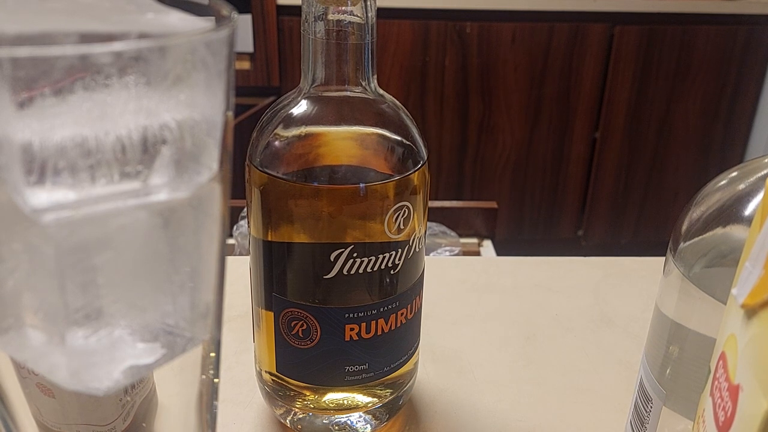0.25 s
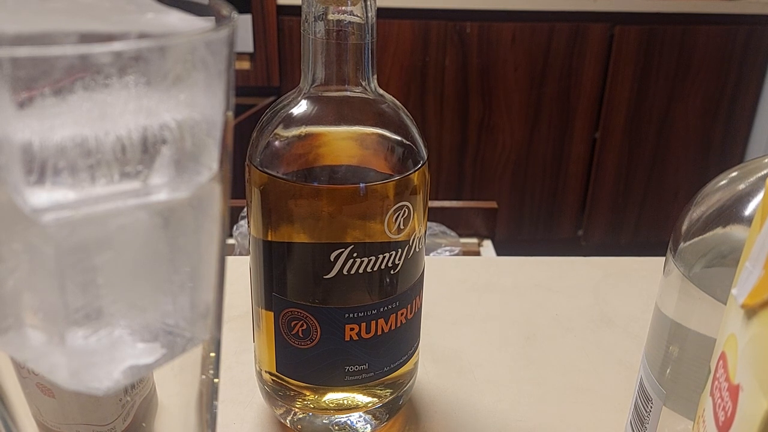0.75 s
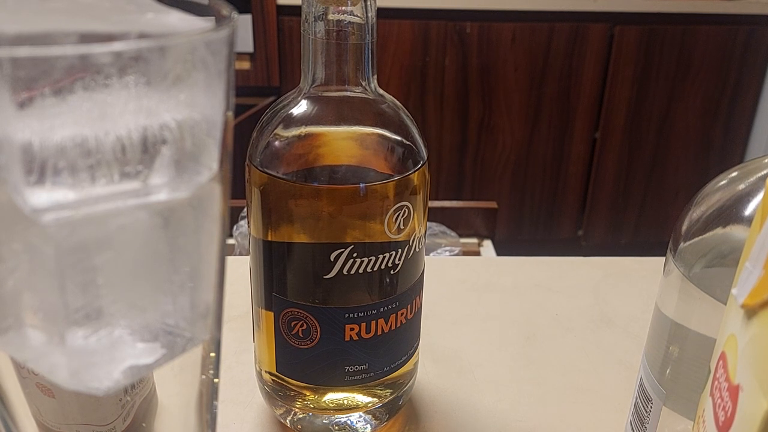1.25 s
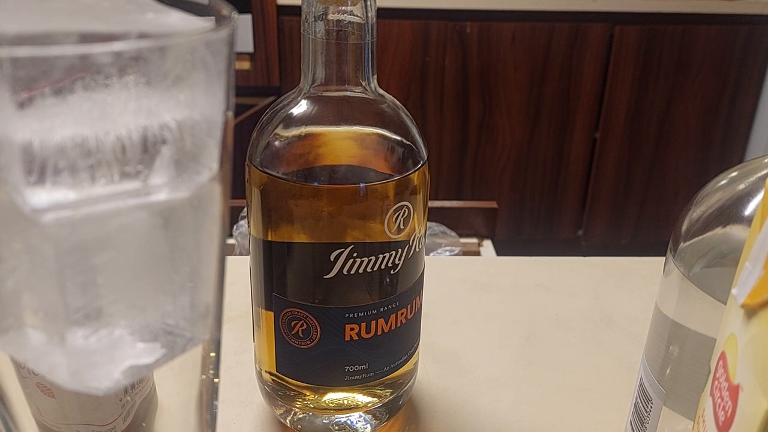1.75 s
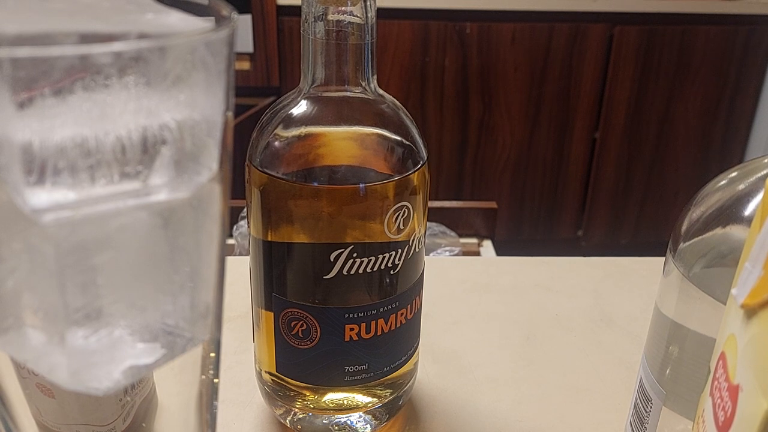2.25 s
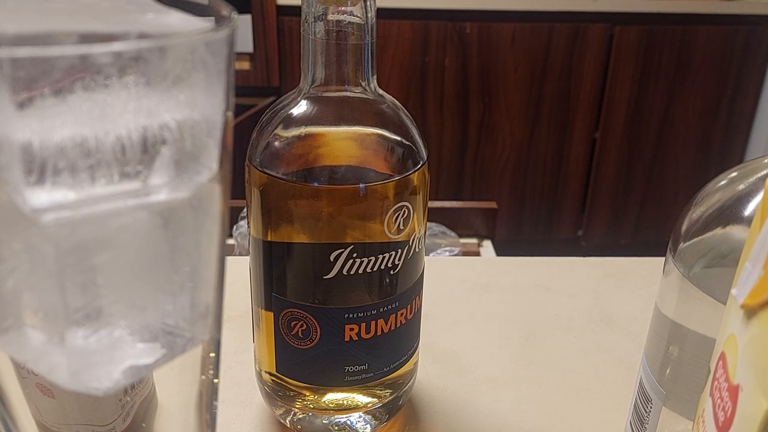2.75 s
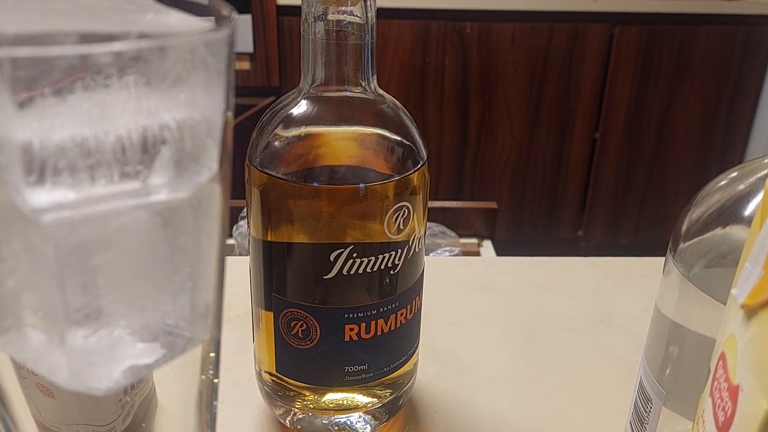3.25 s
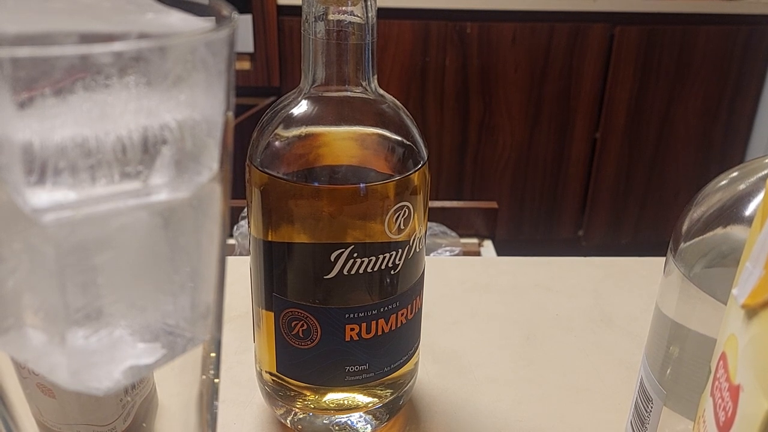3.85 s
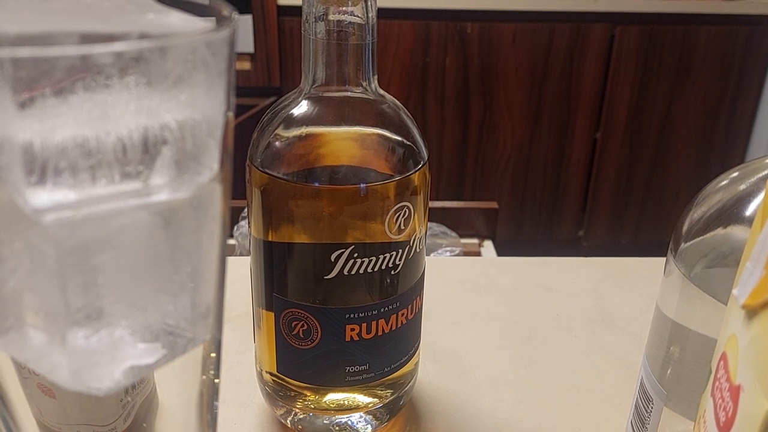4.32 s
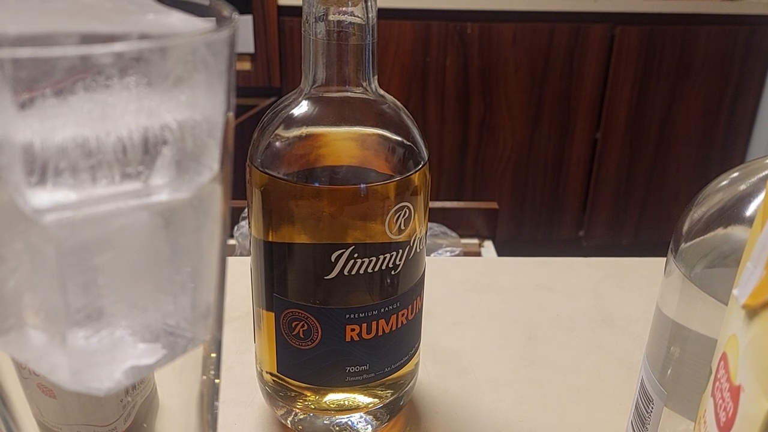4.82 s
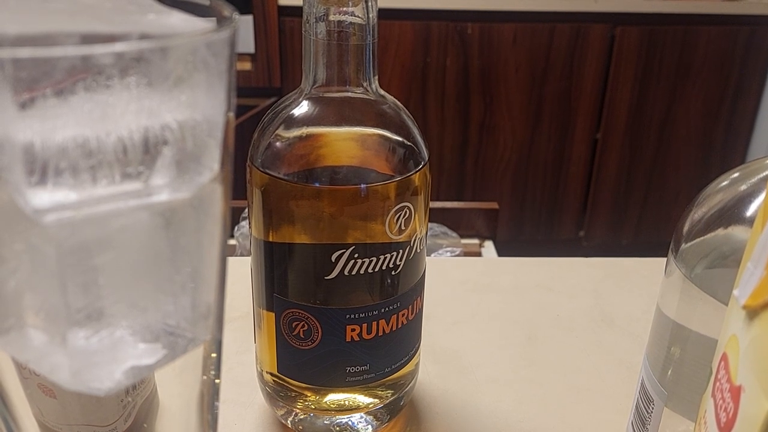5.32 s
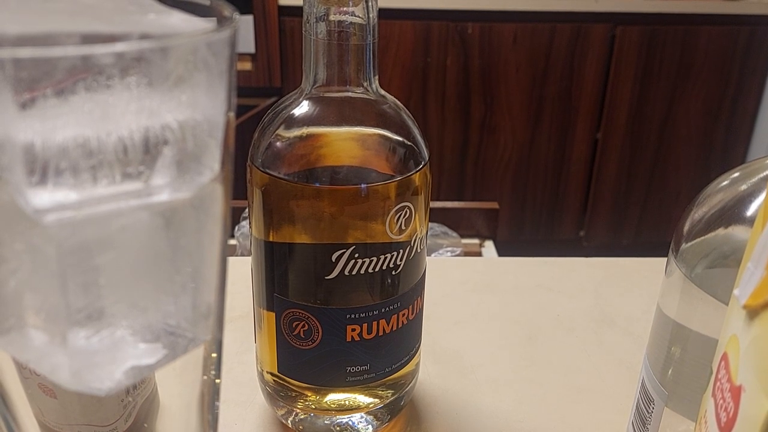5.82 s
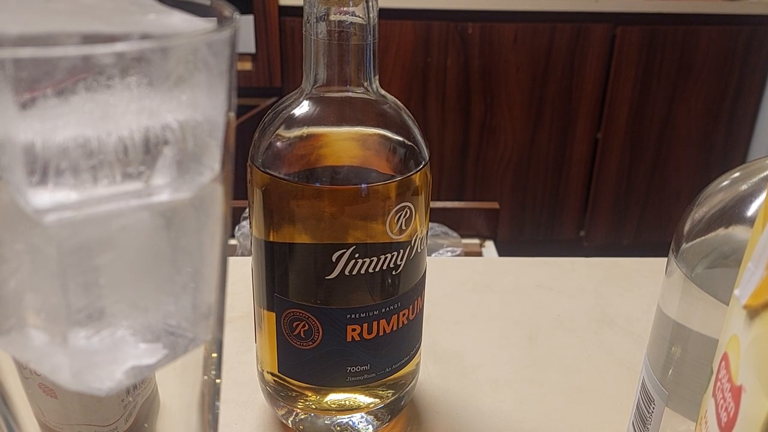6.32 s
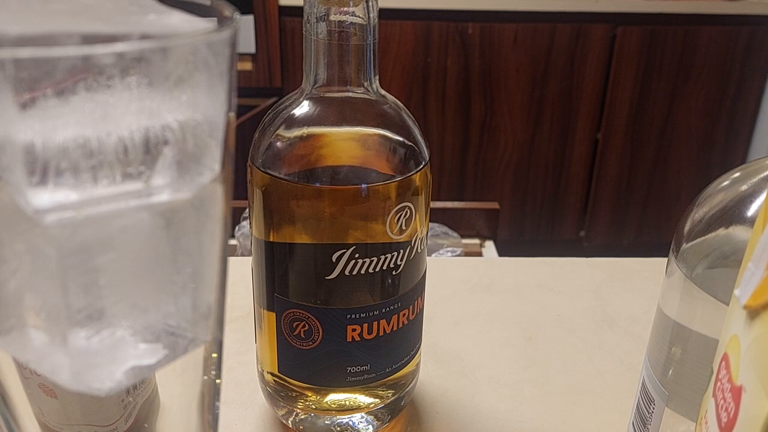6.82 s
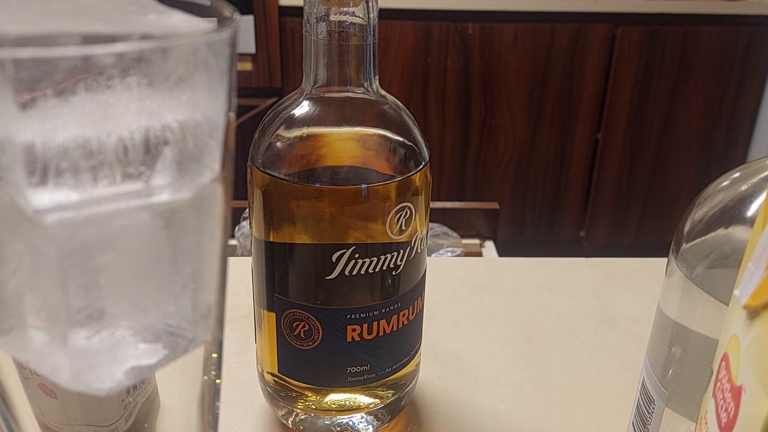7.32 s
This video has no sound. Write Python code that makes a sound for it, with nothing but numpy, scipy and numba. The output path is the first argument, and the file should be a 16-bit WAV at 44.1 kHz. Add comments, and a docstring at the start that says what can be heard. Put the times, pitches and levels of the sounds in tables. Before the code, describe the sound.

Ice cubes are thrown back and forth in a steel cocktail shaker, close to the microphone and a little to the right. Each quick stroke lands as a dense clatter with sharp knocks, a brief metallic ring and the crackle of chipping ice. Liquid gulps and hisses inside. The shaking goes on without a break, in a kitchen with a short echo and faint low room noise.

```python
"""In a kitchen, ice cubes are thrown to and fro in a steel cocktail shaker, close to the right of a phone.
Each throw piles the cubes against one end: a dense clatter and single hard knocks excite the normal
modes of the hand-damped shell and chip the ice. Air pockets in the liquid gulp, and spray hisses.
The far microphone hears it later, in the phone's acoustic shadow. Tiles and cupboards add a short
reverberant tail, and low room noise lies beneath."""
import sys
import numpy as np
from scipy import signal
from scipy.fft import rfft, irfft, next_fast_len
from scipy.io import wavfile
from scipy.ndimage import uniform_filter1d
from numba import njit

SR = 44100
rng = np.random.default_rng(int(sys.argv[2]) if len(sys.argv) > 2 else 0)


def put_to_file(sound):
    """Save the sound as 16-bit audio at rate SR, in the file named by the first command-line argument."""
    columns = np.atleast_2d(sound).T  # one column per channel
    safe = np.clip(columns, -1, 1)
    whole_steps = np.round(safe * 32767)
    wavfile.write(sys.argv[1], SR, whole_steps.astype(np.int16))


N = 334174

# room noise spectrum: f/Hz, level/dB
ROOM_SPECTRUM = [(25, -23), (50, -1.5), (70, -1.5), (140, -0.5), (300, -17), (1000, -56)]
# room noise envelope: t/s, level/dB
ROOM_ENVELOPE = [(0, -62.5), (5.6, -62), (5.75, -57), (6.05, -60), (6.3, -58.5), (7.6, -61.5)]
# acoustic shadow, far microphone relative to near: f/Hz, gain/dB
SHADOW = [(100, -7), (250, -5.5), (700, -3), (1200, 3), (1700, 2), (1950, 2.5), (2500, -6), (3300, -2.5),
          (4600, -5.5), (5600, -4.5), (7000, -13.5), (8000, -21.5), (9500, -30), (11500, -19),
          (15500, -23.5)]
# throws of the load: t/s, duration/s, ring level/dB, thud/dB re ring, crack/dB re ring
THROWS = [(0.011, 0.011, -19.5, -17, -2), (0.101, 0.034, -27.5, -24, -7), (0.207, 0.051, -23.5, -14, -1),
          (0.4, 0.021, -22.5, -13.5, -1), (0.491, 0.046, -48, -22, -3), (0.582, 0.17, -29.5, -23, -0.5),
          (0.691, 0.029, -32.5, -6, -2), (0.791, 0.017, -22.5, -15, -4.5), (0.894, 0.054, -46, -26, 3),
          (0.993, 0.023, -25.5, -13, 0), (1.088, 0.013, -31, -9, 5), (1.181, 0.032, -23.5, -12.5, -5),
          (1.286, 0.028, -32, -15, -3.5), (1.403, 0.02, -25.5, -8.5, 0), (1.495, 0.073, -35, -16, 1),
          (1.601, 0.063, -24.5, -11.5, 0), (1.802, 0.038, -27, -8.5, 6.5), (1.947, 0.012, -24, -14, -2),
          (2.016, 0.063, -29, -7.5, 1.5), (2.225, 0.093, -25.5, -10, -2), (2.337, 0.034, -25.5, -19, -3),
          (2.437, 0.081, -22, -13.5, -3), (2.577, 0.052, -38, -16, 2), (2.667, 0.014, -25, -8.5, 2),
          (2.781, 0.033, -40, -4, -9), (2.849, 0.12, -25, -16.5, -1.5), (3.078, 0.12, -31, -8.5, 6),
          (3.28, 0.061, -27.5, -10.5, 2), (3.41, 0.026, -24, -19, -2.5), (3.483, 0.059, -32.5, -5, 8),
          (3.698, 0.066, -28.5, -9, 2.5), (3.834, 0.027, -37, -39, 1), (3.9, 0.14, -28.5, -12.5, -0.5),
          (4.106, 0.13, -32, -9, 5.5), (4.226, 0.029, -35.5, -20, -1), (4.301, 0.021, -29, -15, 1),
          (4.405, 0.016, -31, -15, 6), (4.504, 0.18, -31, -11, -2), (4.616, 0.017, -34, -20, -5),
          (4.706, 0.11, -27.5, -12, 1), (4.925, 0.16, -29, -11.5, 3), (5.129, 0.1, -29, -12, 2),
          (5.341, 0.16, -29.5, -9.5, 2), (5.493, 0.028, -36, -30, 7), (5.552, 0.22, -27, -14, -3),
          (5.798, 0.051, -24.5, -16, -1.5), (6.017, 0.12, -27.5, -15, 0), (6.229, 0.14, -31, -7.5, 5.5),
          (6.449, 0.15, -29.5, -18, 2), (6.652, 0.14, -29.5, -15, -1), (6.864, 0.062, -29, -22, 2),
          (7.109, 0.082, -25, -16.5, -5.5), (7.253, 0.061, -33, -23, -3), (7.352, 0.082, -33, -3.5, -6),
          (7.461, 0.032, -33, -17, 6), (7.547, 0.052, -27, -23, -4.5)]
# centre of the ring under a landing load, moving as the shell chills and the grip shifts: t/s, f/Hz
RING_CENTRE = [(0, 1920), (2, 2060), (3.5, 2020), (4.5, 1920), (5.9, 2100), (6.9, 2270), (7.58, 2050)]
# spray spectrum: f/Hz, level/dB
SPRAY_SPECTRUM = [(2000, -23), (5000, -42), (7000, -3), (9000, -8.5), (11000, -0.5), (13000, 1.5),
                  (16000, 0.5)]
# a large and a small air pocket per throw: f/Hz, spread/octaves, delay/s, level/dB re thud
FAINT_POCKETS = [(265, 0.11, .04, -7), (684, .4, 0.025, 0)]
# loudest air pockets trapped as the liquid slaps an end: t/s, f/Hz, level/dB over 20 ms
LOUD_POCKETS = [(0.034, 800, -33), (0.235, 790, -36), (0.247, 264, -35.5), (0.425, 590, -35),
                (0.632, 585, -32), (0.633, 760, -36), (0.635, 243, -37), (0.648, 600, -34.5),
                (0.804, 666, -35), (0.842, 575, -36.5), (1.011, 920, -37), (1.199, 470, -32.5),
                (1.233, 263, -42), (1.437, 575, -31), (1.63, 720, -37), (1.842, 613, -32.5),
                (2.06, 660, -37), (2.246, 714, -37), (2.305, 214, -36.5), (2.453, 926, -34),
                (2.455, 300, -30.5), (2.895, 467, -35.5), (3.317, 520, -38.5), (3.71, 255, -40),
                (3.729, 634, -34), (3.947, 685, -34.5), (3.95, 240, -35.5), (4.176, 835, -35),
                (4.178, 496, -35), (4.359, 470, -35), (4.742, 253, -43), (4.783, 586, -39),
                (4.975, 264, -41), (5.15, 657, -33.5), (5.855, 480, -36), (6.052, 687, -38),
                (6.293, 470, -40), (6.507, 470, -37.5), (7.363, 810, -40)]
# spectrum of chipping ice: f/Hz, level/dB
CRACK_SPECTRUM = [(900, -23.5), (2000, 7), (5000, -1), (6500, 2.5), (7600, 2.5), (9000, -3), (11000, 3),
                  (12600, 2.5), (14000, 1), (16000, 0)]
# hard knocks: t/s, ring level/dB, ring centre f/Hz, clink/dB re ring, crack/dB re ring
KNOCKS = [(0.0223, -19, 2050, 2, -6), (0.114, -18, 2020, -7, 1.5), (0.1437, -18.5, 1910, 1, -12),
          (0.2515, -25, 2260, -6, -7), (0.2926, -26, 1940, 2, 3), (0.338, -18, 2000, -3.5, -13),
          (0.4309, -13.5, 1940, 0.5, -8), (0.4929, -22.5, 2020, -3, 4), (0.5103, -16, 1960, -11, -4),
          (0.5343, -18.5, 2010, 3, -1), (0.58, -13, 2220, -8, -18), (0.6081, -11, 2220, -14, -6),
          (0.6169, -12, 1850, -8, -9), (0.6302, -16, 1870, -10, -7), (0.7039, -26.5, 2100, -8, 12),
          (0.7191, -28.5, 2080, -2, 10), (0.8966, -26, 2120, -10, 2), (0.9265, -41, 1900, 5, 21),
          (0.9396, -39, 2140, 1, 19), (0.9528, -41.5, 1820, 5, 20.5), (1.0169, -18, 2020, -2, -8),
          (1.098, -24, 1790, 5, -2), (1.1958, -25, 1910, -9, -5), (1.2124, -14, 1770, -15, -6),
          (1.2467, -41, 2000, 5, 15), (1.2894, -24, 2120, -15, -1), (1.321, -19.5, 1810, 0, -13),
          (1.4246, -11.5, 1850, -10, -15), (1.5024, -22, 2300, 3.5, 9.5), (1.5104, -26, 2080, 8, -9),
          (1.5834, -20.5, 2170, 3, 3), (1.6199, -20.5, 2050, -2, 4), (1.6511, -40, 1930, 9, 13),
          (1.7015, -23, 2200, 4.5, 7), (1.7294, -26.5, 2030, 11, 8), (1.8082, -27.5, 1950, 11, -1),
          (1.8405, -12.5, 1960, -8, -13), (2.0319, -13, 1950, -4, -6), (2.0469, -12.5, 1760, -9, -1.5),
          (2.0686, -23, 1970, -2, -7), (2.1125, -23, 2090, -4, 7), (2.132, -31.5, 2130, 14.5, 2),
          (2.2368, -16, 2150, -6, 2), (2.2491, -16, 2250, 0, -5), (2.2706, -25, 2090, -7, 5),
          (2.2842, -19.5, 1970, -11, 3), (2.344, -20, 2110, -4, -2.5), (2.4558, -14, 1850, -7, -12),
          (2.4662, -21, 2140, 1, -1), (2.5577, -21, 1920, -3, -2), (2.6186, -38, 2000, 20, 18.5),
          (2.6849, -15.5, 2010, -4, -3.5), (2.7227, -20, 2200, -14, -9), (2.798, -20, 1880, -20, -4),
          (2.852, -24, 2150, 4, -1), (2.8648, -25, 1860, -1, -1), (2.8906, -22.5, 2380, 0, 2),
          (2.9338, -22, 1870, 7.5, -5), (3.0179, -30, 2270, 11, 13.5), (3.0404, -36, 2010, 17, 7),
          (3.0655, -36, 1890, 1, 15), (3.0992, -14, 2060, -5, -13), (3.107, -22, 2170, 0, 4),
          (3.1142, -20, 2040, -4, -3), (3.2088, -18, 2050, -5, -7), (3.2881, -18.5, 1920, -13, -9),
          (3.3278, -25, 1980, -8, 8), (3.3763, -24, 1880, 5, 8), (3.4139, -19.5, 2010, 5, -2),
          (3.4872, -19, 2390, -1, 4), (3.515, -16.5, 1930, -8, -4), (3.5289, -19, 1910, -5, -8),
          (3.5355, -27, 2030, -13, -13), (3.5925, -21, 2170, 2, 3), (3.7084, -17.5, 1970, -8, -3),
          (3.718, -20.5, 1950, -2, 4), (3.7278, -17, 1990, -9, -5), (3.737, -25, 2440, -2, -6),
          (3.752, -42, 1910, 10, 15), (3.8448, -15, 1950, -16, -7), (3.855, -25, 1990, -18, -12),
          (3.9164, -15, 1880, -5, -5.5), (3.9832, -16.5, 2210, -15, -15), (4.0483, -28.5, 2100, 11.5, 4),
          (4.1167, -16, 2160, 0.5, -1), (4.1667, -18.5, 1790, -6, -14), (4.2505, -18.5, 1830, -27, -18),
          (4.3245, -20.5, 2040, -12, -5), (4.4252, -21, 2110, 8, 1), (4.5097, -14.5, 2040, -16, -7),
          (4.6375, -19.5, 1860, 1, -2), (4.7151, -24.5, 2130, -16, 5), (4.7217, -15, 1880, -20, -10),
          (4.7338, -31, 1970, -10, 2), (4.7984, -28.5, 2020, 0, 9), (4.9364, -14, 1870, -18, -20),
          (4.962, -15, 2330, -5.5, -8), (5.131, -24, 2170, 7, -3), (5.1483, -16, 1990, -11, -7),
          (5.1715, -19, 1960, -6, -2), (5.209, -28, 1880, 10, 6.5), (5.2571, -22, 2150, 7, 3),
          (5.3443, -30, 2210, 2, 8), (5.4214, -25, 1930, 5, 10), (5.4367, -33, 2220, -3, -10),
          (5.506, -26.5, 2150, 15.5, 9.5), (5.5667, -19.5, 2460, 3, 0), (5.5761, -25, 2300, -12, -6),
          (5.6192, -13, 1960, -7, -5), (5.6719, -17, 2320, -7, -15), (5.8036, -22, 1940, 4, -11),
          (5.8154, -10, 2100, -15, -23), (5.9034, -18, 2430, -13, -19), (6.0415, -15.5, 2440, -2, 0),
          (6.0512, -13, 2420, -3, -6), (6.2382, -14, 2330, -17, -20), (6.263, -13.5, 2030, -20, -1.5),
          (6.4577, -20.5, 2520, -2, 4), (6.4704, -17, 2450, -1, -9), (6.4818, -15, 2580, -1, -12),
          (6.4898, -18, 2220, -6, 3.5), (6.5195, -24, 2250, 5, 2), (6.6654, -14, 2510, -19, -18),
          (6.6927, -21.5, 2300, -4, 7), (6.7251, -12.5, 2460, -7, -3), (6.7424, -14.5, 1900, -10, 0),
          (6.867, -22.5, 1990, 1, -4), (6.9131, -19, 2260, -9, -5), (6.949, -12, 2400, -6, -8),
          (6.9646, -24, 2260, -13, -7), (6.9974, -19, 2360, -18, -22), (7.029, -23, 2130, 3, -9),
          (7.0986, -24.5, 1850, 4, -1), (7.1168, -22, 2560, -4, -20), (7.1293, -11, 2380, -14, -24),
          (7.1587, -14.5, 2300, -11, -1.5), (7.1814, -14, 2080, -16, -6), (7.3384, -27, 2410, -15, -14),
          (7.3637, -10.5, 1990, -9, -20), (7.3738, -19.5, 2280, 1, 7), (7.4062, -19.5, 2170, -12, 2),
          (7.4269, -28, 2300, -9, -6)]
# low, middle and high shell modes: f/Hz, level/dB, T60/s, coherence between the microphones (0-1)
THUD_MODES = [(170, -9, 0.046, 0.93), (242.4, -4.5, 0.13, 0.83), (306, -6.5, 0.019, 0.87),
              (470, -0.5, 0.033, 0.92), (590, 6.5, 0.02, 0.89), (760, 11.5, 0.012, 0.57),
              (940, 9.5, 0.055, 0.44)]
RING_MODES = [(1398, 4, 0.023, 0.66), (1637, 5, 0.011, 0.97), (1770, 4, 0.011, 0.67),
              (1890, -6.5, 0.054, 0.78), (2040, 0.5, 0.018, 1), (2150, -7, 0.0033, 1),
              (2200, -8, 0.028, 0.15), (2450, -3.5, 0.01, 1), (2530, -11, 0.013, 0.23),
              (2935, 0.5, 0.0064, 0.36)]
CLINK_MODES = [(3270, -7.5, 0.0035, 0.07), (3952, -4.5, 0.021, 0.49), (3967, 0, 0.017, 0.08),
               (3980, -11.5, 0.0018, 1), (4380, -1.5, 0.0082, 0.089), (4660, 0, 0.013, 0.078),
               (5084, -2, 0.004, 0.23), (5370, -5.5, 0.0075, .2)]

DIFFRACTION_HZ = 856  # longer waves bend round the phone and reach both microphones in phase


def amp(db):
    """Amplitude ratio of a level in decibels."""
    return 10 ** (np.asarray(db) / 20)


def colour(x, spectrum):
    """Zero-phase filtering through points of f/Hz, gain/dB."""
    hz, db = np.transpose(spectrum)
    size = next_fast_len(N)
    f = np.maximum(np.arange(size // 2 + 1) * SR / size, 1)
    gain = amp(np.interp(np.log(f), np.log(hz), db))
    return irfft(rfft(x, size) * gain, size)[..., :N]


def bass(x, hz):
    """Zero-phase low-pass; x - bass(x) is its complement."""
    return signal.sosfiltfilt(signal.butter(1, hz, fs=SR, output="sos"), x)


def impulses(at, size):
    """Superposition of impulses at the given samples."""
    return np.bincount(at, size, N)[:N]


def drift(rate_hz):
    """Linear interpolation between random values; standard deviation near 1."""
    step = int(SR / rate_hz)
    return 1.2 * uniform_filter1d(np.repeat(rng.standard_normal(N // step + 1), step), step)[:N]


def room_noise():
    """Partial coherence: the microphones share part of a low noise that swells once."""
    noise = rng.standard_normal((3, N))
    rumble = colour(noise[0] + 0.76 * noise[1:], ROOM_SPECTRUM)
    level_db = np.interp(np.arange(N) / SR, *np.transpose(ROOM_ENVELOPE))
    return rumble / np.sqrt(np.mean(rumble ** 2)) * amp(level_db)


def reverberation(x, t60=0.19, band_hz=(400, 5000), wet_db=-8, places=2):
    """Diffuse reflections decay exponentially, differently for each microphone and shaker position."""
    t = np.arange(int(.3 * SR)) / SR
    tails = rng.standard_normal((places, 2, len(t))) * np.exp(-np.log(1000) * t / t60) * (t > .003)
    tails[:, 0] += bass(tails[:, 1] - tails[:, 0], 1.58 * DIFFRACTION_HZ)  # long waves are shared
    tails = signal.lfilter(*signal.butter(1, band_hz, "band", fs=SR), tails)
    tails *= amp(wet_db) / np.sqrt(np.sum(tails ** 2, 2, keepdims=True))
    weights = np.array([drift(20) for _ in range(places)])
    weights /= np.sqrt(np.sum(weights ** 2, 0)) + .01
    return sum(signal.fftconvolve(x * w, tail, axes=1)[:, :N] for w, tail in zip(weights, tails))


def load(t):
    """Incoherent throws add in power. Gives ring/dB, its centre/Hz, and thud, clink, crack/dB re ring."""
    t = t[:, None]
    start, length, ring_db, thud_db, crack_db = np.transpose(THROWS)
    centre_hz = np.interp(start, *np.transpose(RING_CENTRE))
    clink_db = -3 - .5 * (ring_db + 28)  # harder throws clink less
    rise = 1 / (1 + np.exp(np.clip((start - t) / 0.009, -50, 50)))
    fall = np.exp(-np.maximum(t - start - 0.58 * length, 0) / 0.033)
    landing = rise * fall * amp(2 * ring_db)
    # cubes tumble between the throws and fall quiet in free flight just before they land
    flight = np.exp(-((t - start + 0.015) / 0.01) ** 2).max(1)
    tumbling = amp(2 * (-31 - 7.2 * flight))
    power = landing.sum(1) + tumbling
    timbres = (centre_hz, 1883), (thud_db, -12), (clink_db, -0.5), (crack_db, 1.24)
    means = [(landing @ thrown + tumbling * loose) / power for thrown, loose in timbres]
    return 10 * np.log10(power), *means


def spray():
    """Amplitude-modulated noise: liquid and chips hiss along the wall, louder for harder throws."""
    t = np.arange(0, N / SR, .002)
    ring_db, _, _, _, crack_db = load(t)
    level_db = ring_db + crack_db - 3.5 + 0.73 * (ring_db - ring_db.mean())
    hiss = colour(rng.standard_normal((2, N)), SPRAY_SPECTRUM) * amp(3.1 * drift(150))
    return hiss * np.interp(np.arange(N) / SR, t, amp(level_db))


def faint_pockets(scatter_s=.012, scatter_db=2):
    """Air entrainment: every landing traps one pocket of each size. Rows of t/s, f/Hz, level/dB."""
    start, _, ring_db, thud_db, _ = np.transpose(THROWS)
    rows = []
    for hz, octaves, delay_s, over_db in FAINT_POCKETS:
        chance = rng.standard_normal((len(start), 3)).T
        rows += zip(start + delay_s + scatter_s * chance[0],
                    hz * 2 ** (octaves * chance[1]),
                    ring_db + thud_db + over_db + scatter_db * chance[2])
    return rows


def gulps(glide=0.12):
    """Bubble resonance: each air pocket swells, rings a few cycles and glides up as it rises."""
    out = np.zeros(N + SR // 2)
    t = np.arange(int(.1 * SR)) / SR
    for s, hz, db in LOUD_POCKETS + faint_pockets():
        tau = 0.00197 + 0.44 / hz
        phase = 2 * np.pi * hz * t * (1 + glide * (t / tau / 4 - .5))
        wave = t * np.exp(-t / tau) * np.sin(phase)
        at = max(int((s - 1.546 * tau) * SR), 0)  # centres the energy near time s
        out[at:at + len(t)] += amp(db) * wave * np.sqrt(.02 * SR / np.sum(wave ** 2))
    return out[:N]


def cracks(at, size, knock_count, knock_t60=0.0052, clatter_t60=0.012):
    """Brittle fracture: ice chips in a noise burst, shorter for the hard knocks, which are listed first."""
    power = 0
    for part, t60 in ((slice(knock_count), knock_t60), (slice(knock_count, None), clatter_t60)):
        decay = np.exp(-2 * np.log(1000) / (t60 * SR))
        energy = impulses(at[part], size[part] ** 2) + 1e-18
        power = power + signal.lfilter([1 - decay], [1, -decay], energy)
    return colour(np.sqrt(power) * rng.standard_normal((2, N)), CRACK_SPECTRUM)


def clatter(count=5500, hold_s=0.0004):
    """A random point process: small collisions whose energy follows the level of the load."""
    at = np.sort(rng.integers(0, N, count))
    chance = rng.standard_normal((count, 4))
    load_db, centre_hz, thud_db, clink_db, crack_db = load(at / SR)
    excess_db = np.minimum(3.45 * rng.exponential(1, count), 11.2)
    ring_db = load_db + 10 * np.log10(hold_s * SR) + excess_db
    return np.array([at, ring_db, centre_hz * (1 + 0.12 * chance[:, 3]),
                     ring_db + thud_db + 4.4 * chance[:, 0],
                     ring_db + clink_db + 4.25 * chance[:, 1],
                     ring_db + crack_db + 3.28 * chance[:, 2]])


def knocks(hold_s=0.0045, thud_db=-19.5):
    """Impulsive excitation: each hard knock carries the energy of its level held for hold_s."""
    s, level_db, centre_hz, clink_db, crack_db = np.transpose(KNOCKS)
    ring_db = level_db + 10 * np.log10(hold_s * SR)
    return np.array([s * SR // 1, ring_db, centre_hz,
                     ring_db + thud_db, ring_db + clink_db, ring_db + crack_db])


@njit
def resonate(force, hz, decay, swell):
    """A damped oscillator of drifting frequency and finite rise time, heard at both microphones."""
    out = np.empty_like(force)
    for mic in range(2):
        state = smoothed = turn = 0j
        for i in range(force.shape[1]):
            if i % 64 == 0:
                turn = np.exp(2j * np.pi * hz[i] / SR)
            state = state * turn * decay + force[mic, i] + 1e-18
            smoothed = smoothed * turn * swell + (1 - swell) * state
            out[mic, i] = smoothed.imag
    return out


def struck_modes(at, size, modes, wander, centre_hz=None, octaves=1, swell_s=0.00022):
    """Modal superposition: every blow lands elsewhere, so each mode takes its own share of the energy."""
    mode_hz, mode_db, _, _ = np.transpose(modes)
    share = amp(mode_db) * np.ones((len(at), 1))
    if centre_hz is not None:
        share *= np.exp(-.5 * (np.log2(mode_hz / centre_hz[:, None]) / octaves) ** 2)
    share *= (size / np.sqrt(np.sum(share ** 2, 1)))[:, None]
    chance = rng.standard_normal((len(at), len(modes), 2))
    out = np.zeros((2, N))
    for k, (hz, _, t60, coherence) in enumerate(modes):
        near = np.sign(chance[:, k, 0]) * np.abs(chance[:, k, 0]) ** 0.32  # narrows the spread of sizes
        far = coherence * near + np.sqrt(1 - coherence ** 2) * chance[:, k, 1]
        decay = np.exp(-np.log(1000) / (t60 * SR))
        blows = np.array([impulses(at, share[:, k] * mic) for mic in (far, near)])
        force = np.sqrt(2 * (1 - decay ** 2)) * blows
        loaded_hz = hz * (1 + wander * drift(15))  # grip and moving liquid load the shell
        out += resonate(force, loaded_hz, decay, np.exp(-1 / (swell_s * SR)))
    return out


def shell():
    """Free vibration after impact: all blows ring the same modes of the shell, and chip the ice."""
    at, ring_db, centre_hz, thud_db, clink_db, crack_db = np.concatenate([knocks(), clatter()], 1)
    at = at.astype(int)
    load_db = load(at / SR)[0]
    # only the whole load landing moves the deepest modes
    thud_hz = np.clip(600 * amp(-1.4 * (load_db + 32)), 300, 1000)
    ring = struck_modes(at, amp(ring_db), RING_MODES, wander=0.013, centre_hz=centre_hz, octaves=0.18)
    thud = struck_modes(at, amp(thud_db), THUD_MODES, wander=0.046, centre_hz=thud_hz, octaves=0.84)
    clink = struck_modes(at, amp(clink_db), CLINK_MODES, wander=0.02)
    return ring + thud + clink + cracks(at, amp(crack_db), len(KNOCKS))


def scene(lag_samples=14):
    """Diffraction and shadowing: short waves reach the far, left microphone later and mostly weaker."""
    shaker = shell() + gulps() + spray()
    # so small a vessel radiates no deep bass
    shaker = signal.sosfilt(signal.butter(2, 140, "high", fs=SR, output="sos"), shaker)
    far, near = shaker + reverberation(shaker)
    low = bass(far, DIFFRACTION_HZ)
    late_treble = np.concatenate([np.zeros(lag_samples), (far - low)[:-lag_samples]])
    return np.array([colour(low + late_treble, SHADOW), near]) + room_noise()


def record(dry, top_hz=15800):
    """Saturation and band limiting: the phone clips near full scale and cuts the highest treble."""
    low_pass = signal.ellip(10, .2, 75, top_hz, fs=SR, output="sos")
    return signal.sosfilt(low_pass, np.clip(dry, -.95, .95))


dry = scene()
out = record(dry)
put_to_file(out)
```